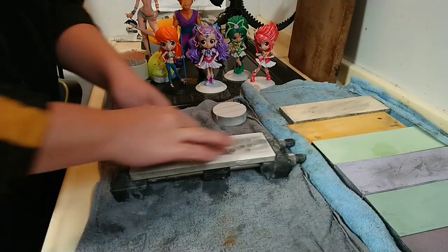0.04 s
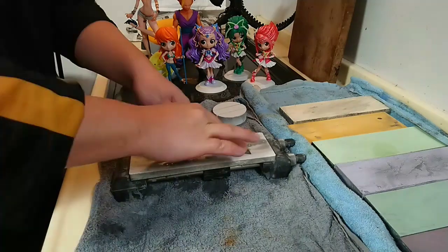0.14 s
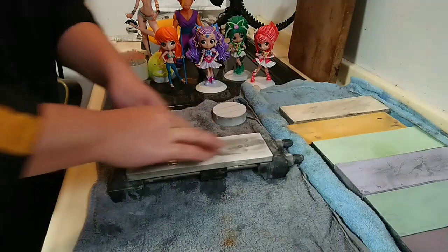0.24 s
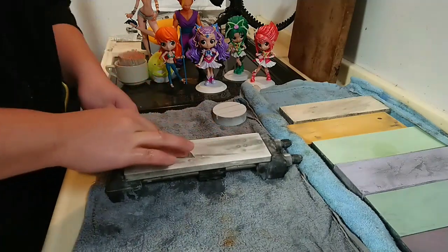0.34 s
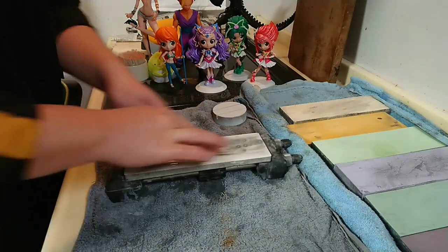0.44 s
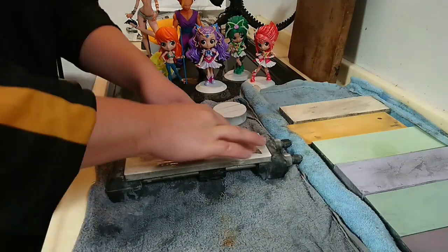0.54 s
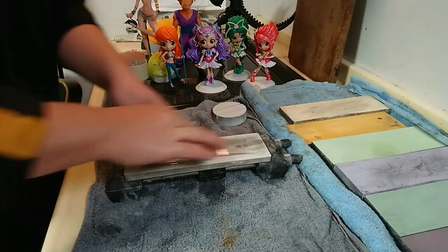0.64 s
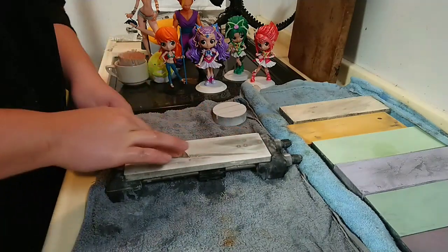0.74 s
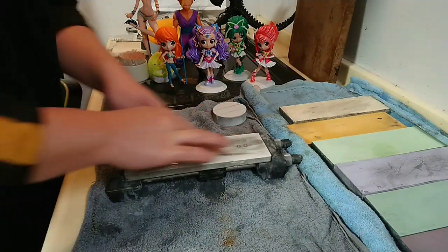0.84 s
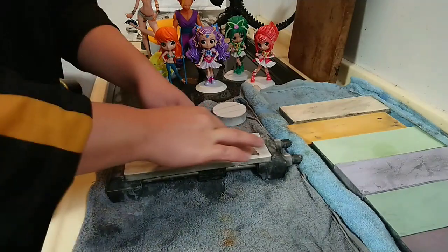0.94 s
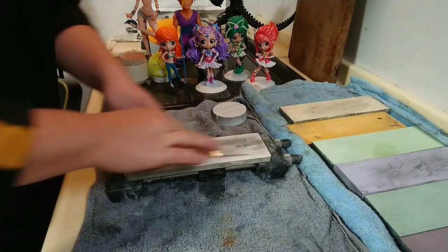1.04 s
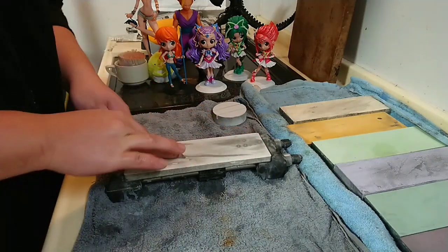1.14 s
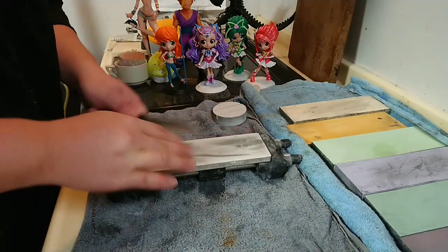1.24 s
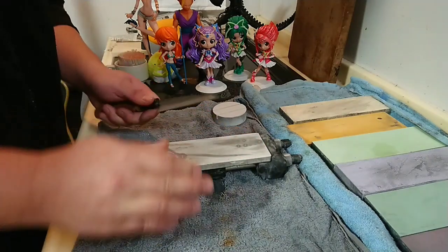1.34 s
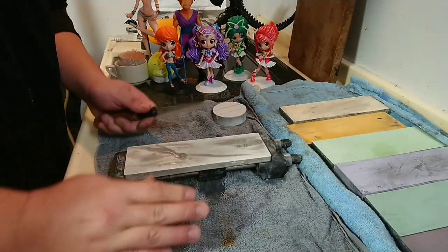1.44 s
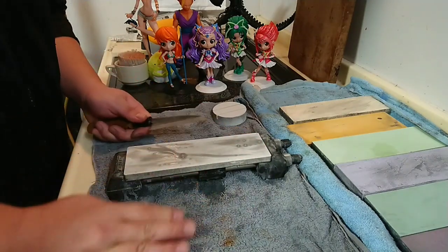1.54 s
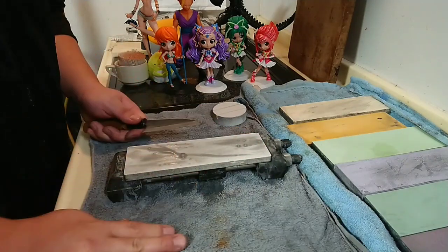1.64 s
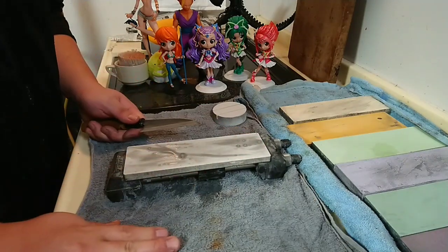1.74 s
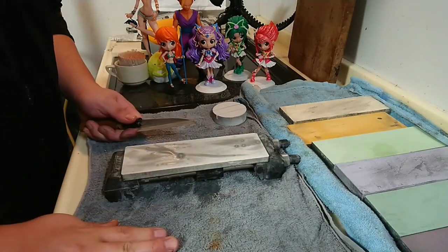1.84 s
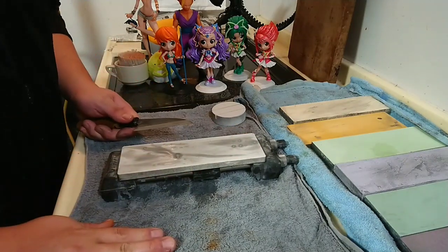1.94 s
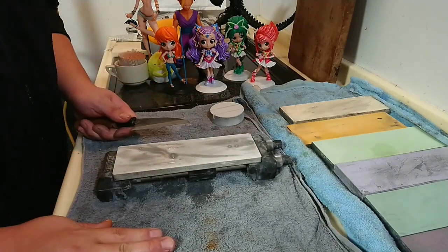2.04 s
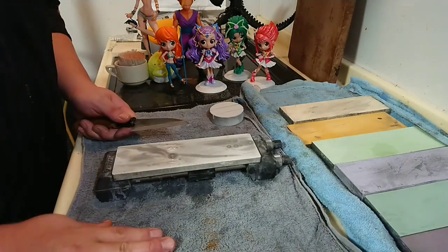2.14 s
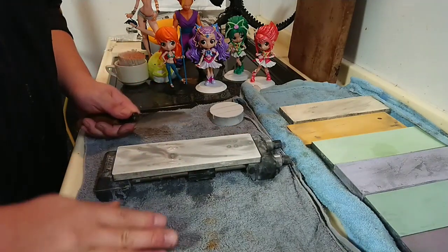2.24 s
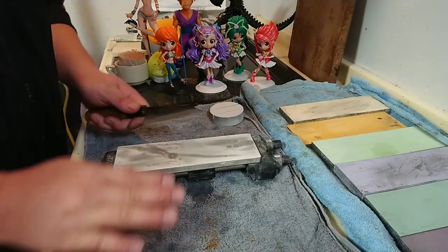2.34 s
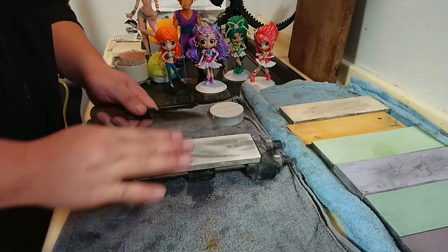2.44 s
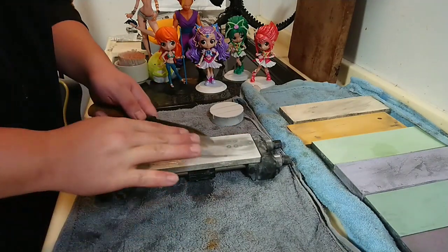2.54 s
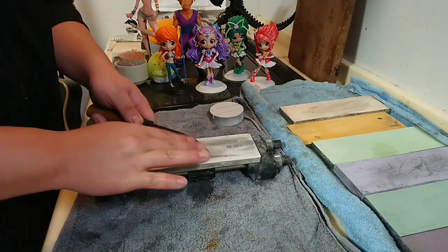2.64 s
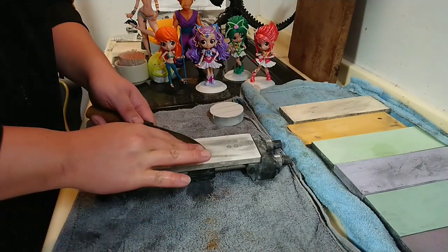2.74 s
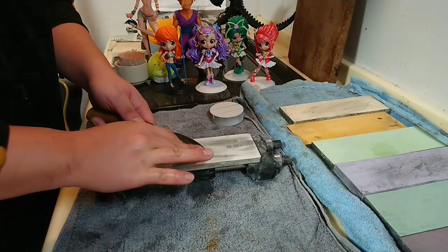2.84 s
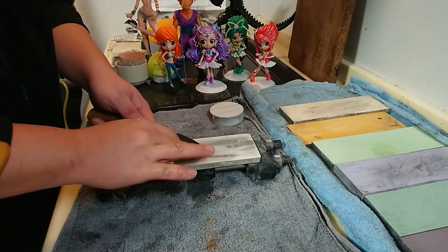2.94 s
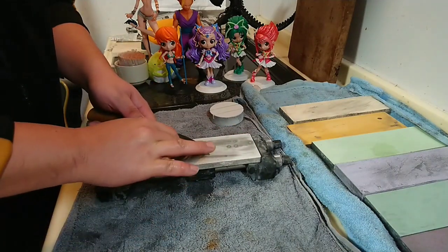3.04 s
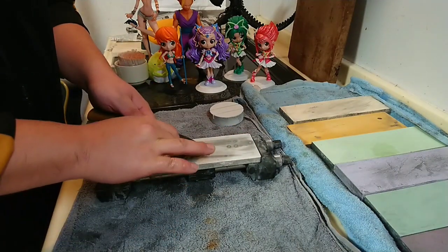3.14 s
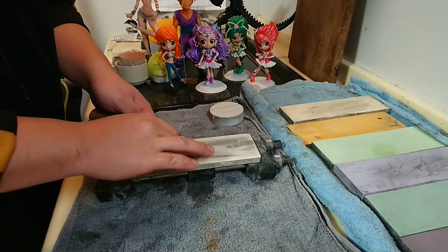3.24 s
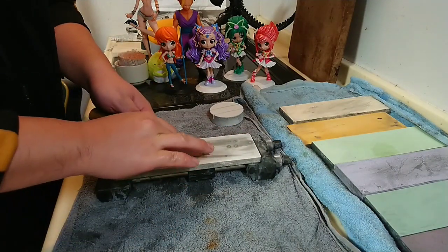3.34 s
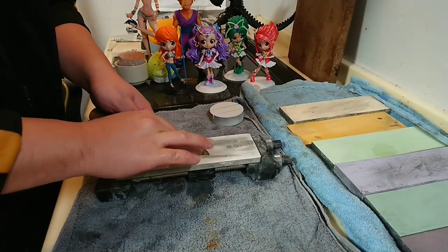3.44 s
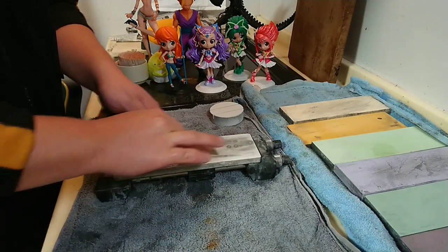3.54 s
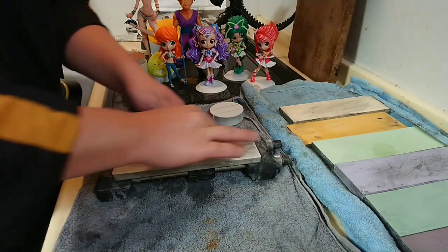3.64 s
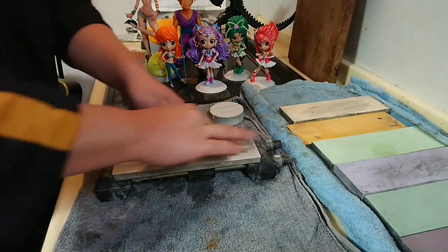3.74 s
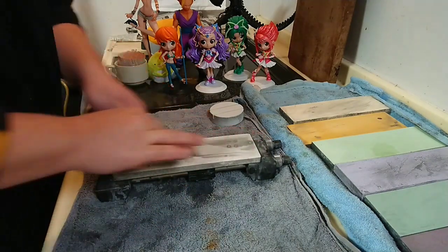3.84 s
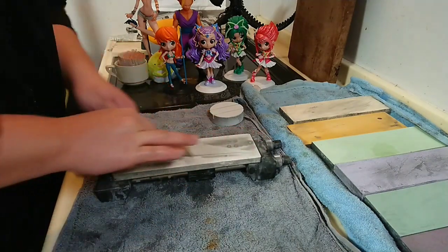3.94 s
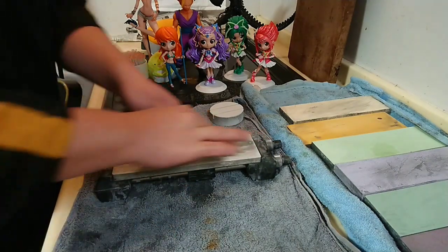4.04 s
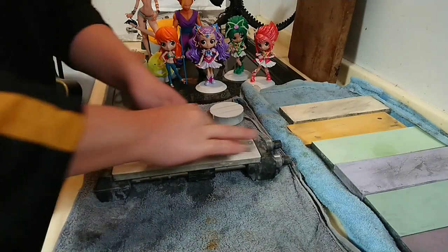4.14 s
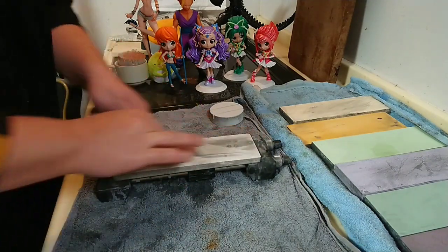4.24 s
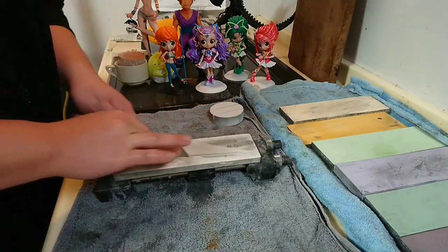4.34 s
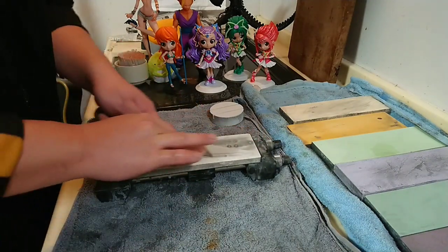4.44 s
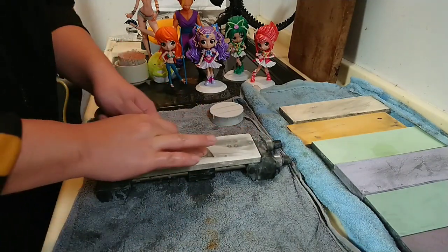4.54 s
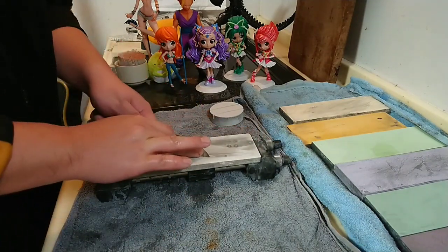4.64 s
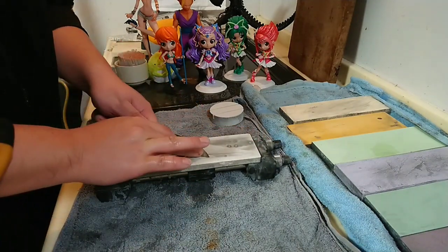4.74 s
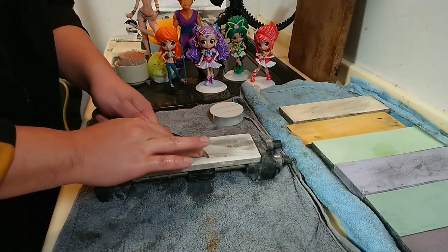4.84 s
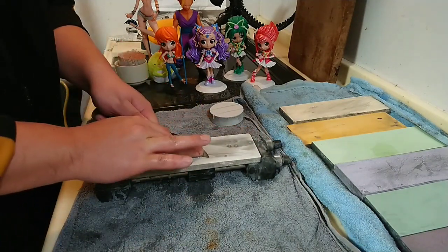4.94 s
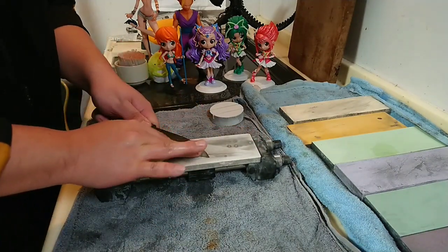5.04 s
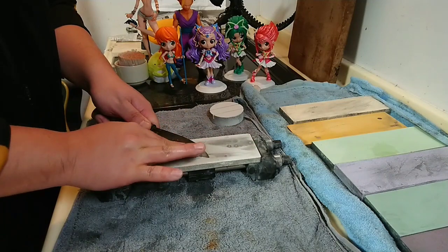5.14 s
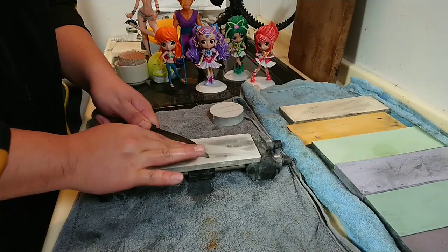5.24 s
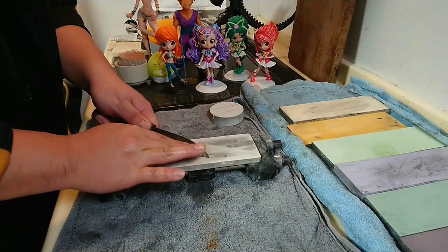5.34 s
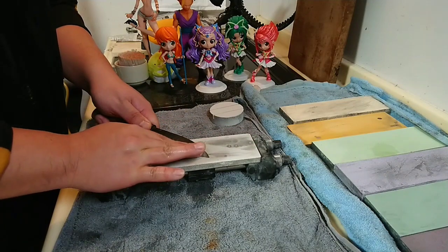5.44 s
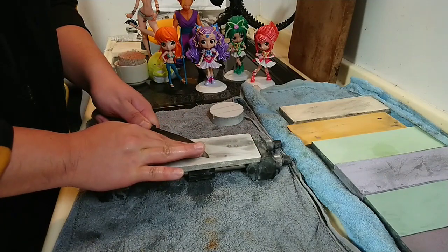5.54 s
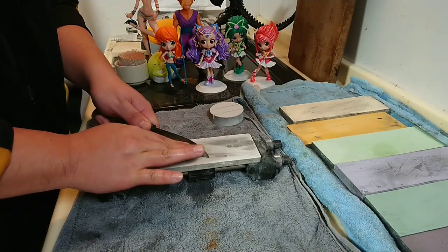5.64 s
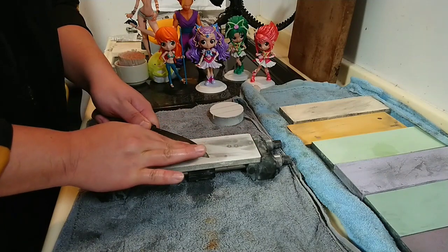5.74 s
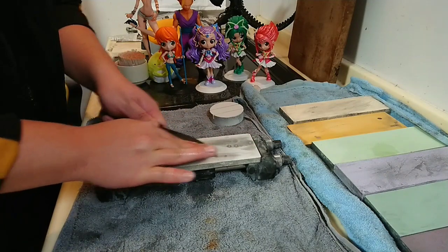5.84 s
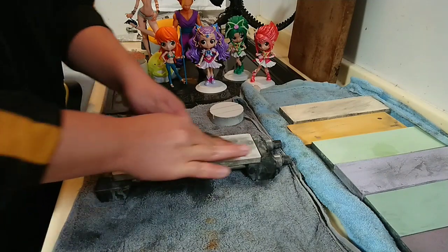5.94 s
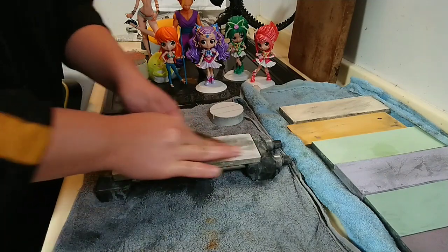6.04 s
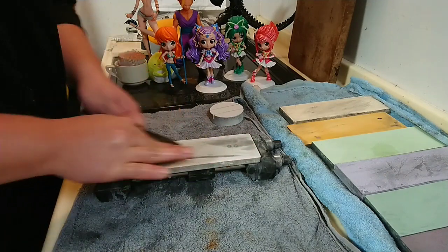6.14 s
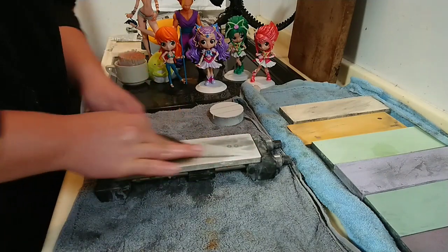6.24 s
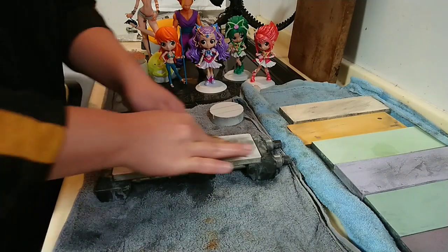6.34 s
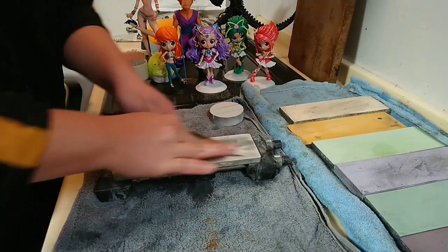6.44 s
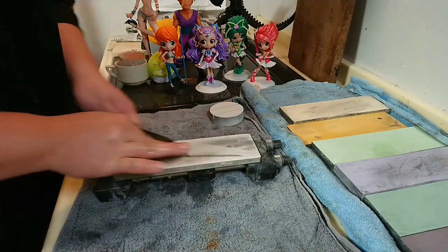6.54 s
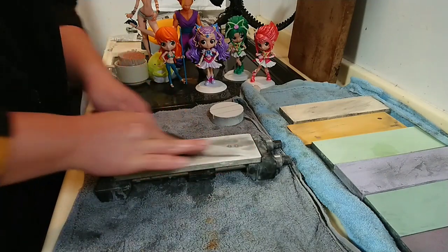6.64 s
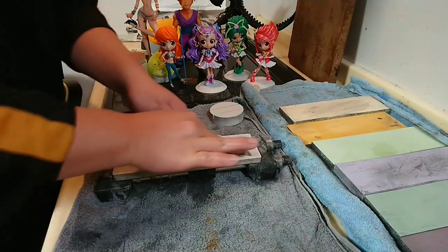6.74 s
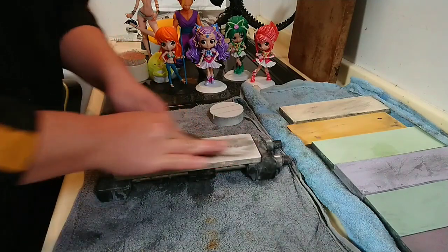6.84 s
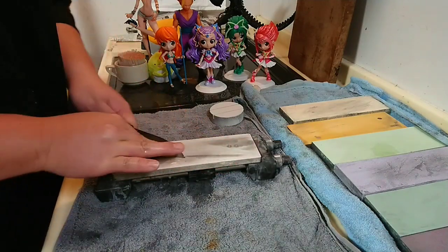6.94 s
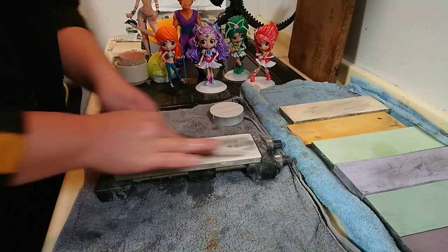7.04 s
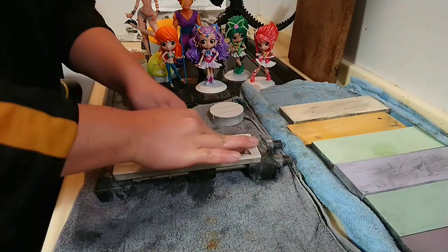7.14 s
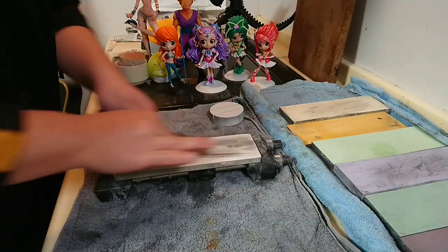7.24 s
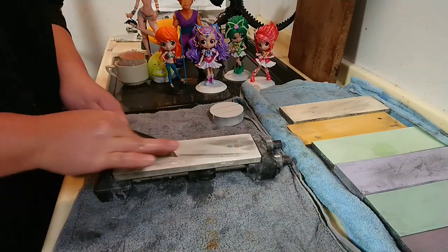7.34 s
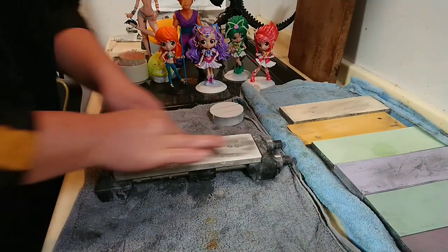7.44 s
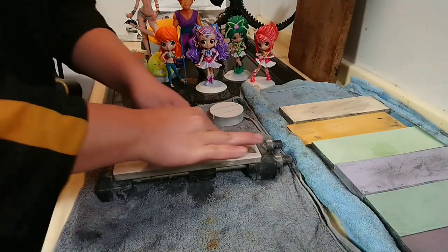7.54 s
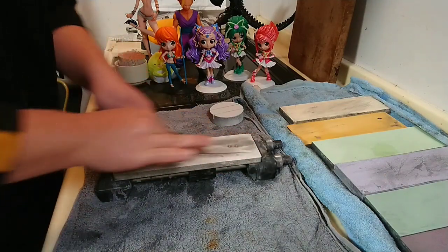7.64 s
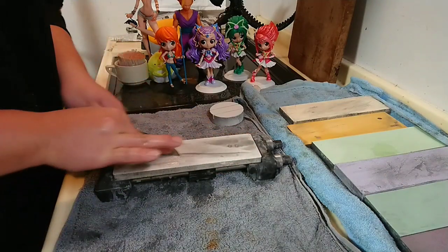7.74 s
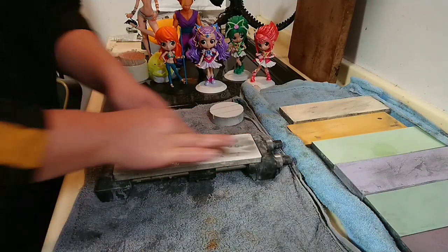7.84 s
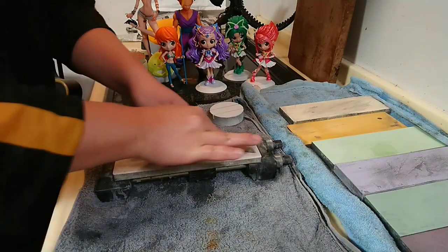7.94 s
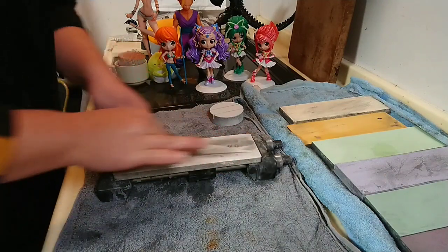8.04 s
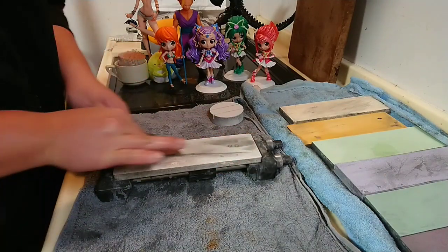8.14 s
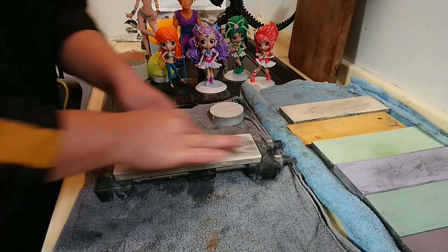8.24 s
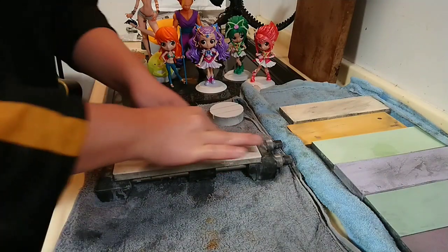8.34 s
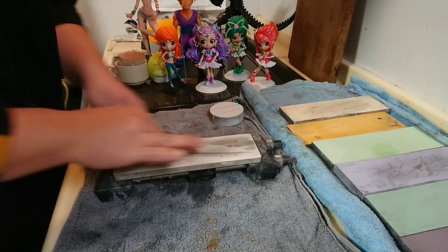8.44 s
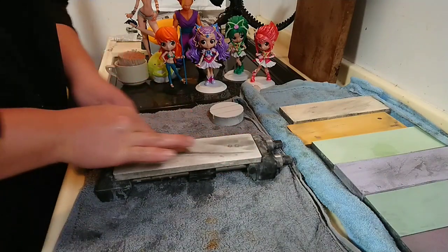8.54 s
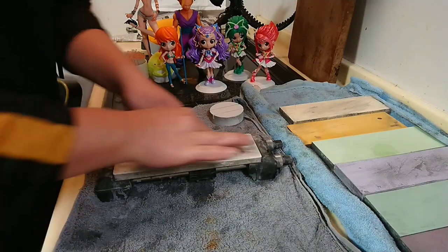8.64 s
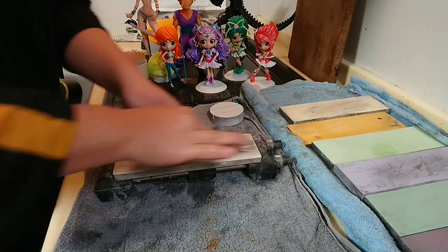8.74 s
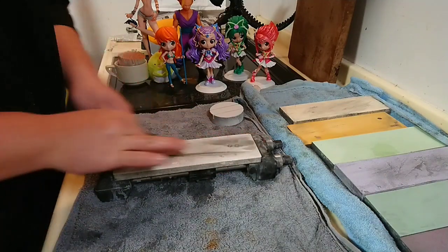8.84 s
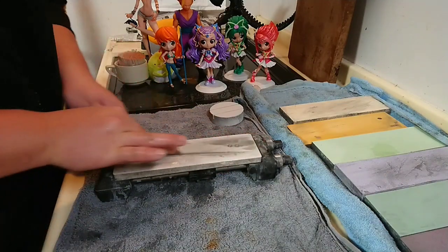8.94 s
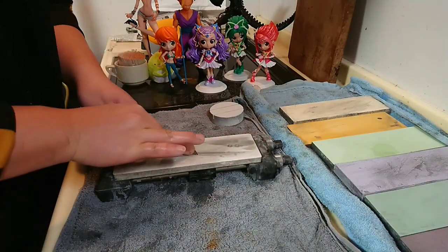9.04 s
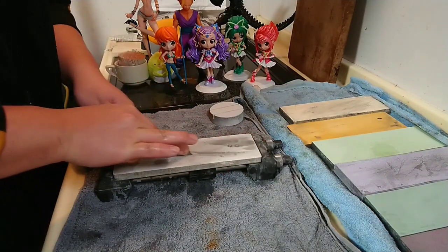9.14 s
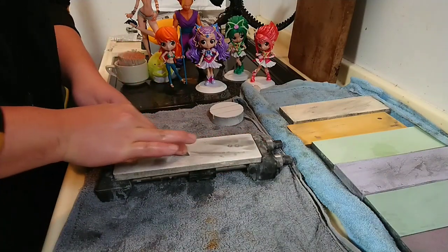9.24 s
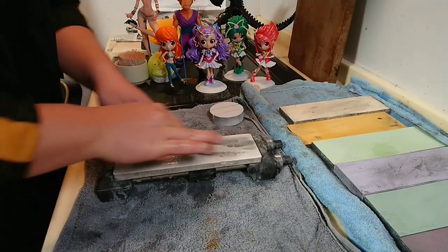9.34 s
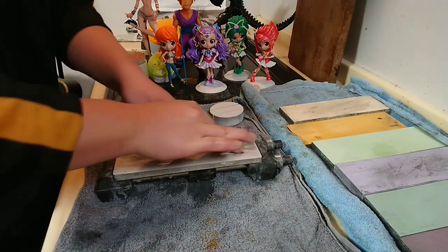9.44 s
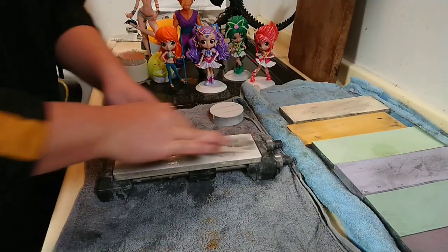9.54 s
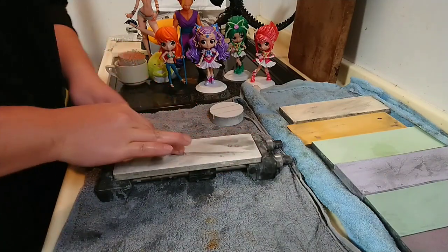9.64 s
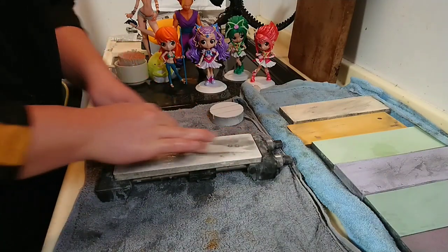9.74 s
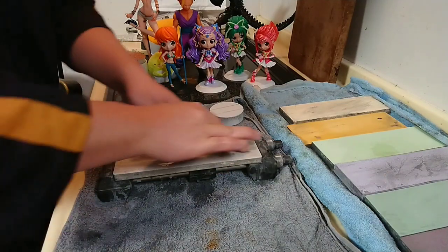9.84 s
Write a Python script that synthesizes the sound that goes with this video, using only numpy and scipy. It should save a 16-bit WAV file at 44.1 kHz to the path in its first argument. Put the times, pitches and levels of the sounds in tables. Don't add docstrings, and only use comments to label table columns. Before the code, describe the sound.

Three runs of fast whetstone strokes, heard close in a dry indoor room. The scrape is dense, sandy hiss with thin blade ringing and a lower stony rasp, swelling and dipping with each push and pull. The first run is duller, the middle one short and brighter, the last long and steady with a small hitch near its end. Quiet gaps hold light clicks, wet fizz and faint room noise; low table rumble lies under the strokes.

```python
import sys
import numpy as np
from scipy import signal
from scipy.io import wavfile
from scipy.ndimage import uniform_filter1d

SR = 44100
rng = np.random.default_rng(int(sys.argv[2]) if len(sys.argv) > 2 else 0)


def linear_from_db(decibels):
    return 10 ** (np.asarray(decibels, float) / 20)


def to_wav(s):
    ch = np.atleast_2d(s).T
    pcm = np.round(np.clip(ch, -1, 1) * 32767)
    wavfile.write(sys.argv[1], SR, pcm.astype(np.int16))


N = 436149
TIME = np.arange(N) / SR

# turn_s, top_db, top_speed_place (0-1), stone_ring_db, turn_level_db
FIRST_RUN = [(-0.05, -22, 0.37, -18.5, -43.5), (0.175, -29, 0.51, -11, -54.5),
             (0.384, -24, 0.46, -16.5, -43), (0.582, -27, 0.49, -17, -42), (0.778, -24.5, 0.43, -15, -44),
             (0.976, -26.5, 0.33, -20, -40)]
SECOND_RUN = [(3.468, -28, 0.69, -18.5, -62), (3.734, -24.5, 0.5, -19.5, -44),
              (3.939, -23, 0.54, -18.1, -40), (4.143, -25.5, 0.4, -17.5, -44),
              (4.352, -32, 0.37, -19.6, -48), (4.539, -45, 0.48, -15, -69)]
THIRD_RUN = [(5.799, -25.5, 0.61, -24, -61), (6.023, -23, 0.54, -22.5, -40), (6.224, -21.5, 0.44, -27, -43),
             (6.412, -26.5, 0.54, -24.5, -37), (6.614, -22, 0.5, -28, -42.5), (6.8, -24, 0.47, -28.5, -39),
             (6.991, -23, 0.51, -29.5, -40), (7.174, -27, 0.52, -22.5, -33.5),
             (7.374, -22.5, 0.55, -27.5, -38), (7.572, -25.5, 0.47, -23.5, -37.5),
             (7.767, -24, 0.42, -27, -41.5), (7.961, -25, 0.6, -24, -33.5), (8.152, -22.5, 0.47, -27, -37),
             (8.348, -27, 0.44, -26, -34), (8.543, -24, 0.56, -31, -41.5), (8.73, -24, 0.54, -24, -33.5),
             (8.937, -28.5, 0.34, -26, -40), (9.092, -40, 0.48, -23.5, -51.5),
             (9.255, -22.5, 0.55, -30, -53.5), (9.495, -26.5, 0.52, -24, -41.5),
             (9.7, -24.5, 0.48, -22.5, -46)]
# end_s, end_level_db, blade_ring_db, brightness_db, held_pitch_factor
RUNS = [
    (1.208, -49.5, -5.5, -2, .995),
    (4.7, -56, 0.5, -1, 1.053),
    (9.92, -61, -1, 0, 1.002),
]
OPENING_WAY = (-1, 1, 1)
# pitch_hz, width_hz, level_db
PRESSED_BLADE = [(2570, 150, -6.5), (2820, 340, -15), (3273, 45, -30), (3190, 18, -2), (3670, 40, -5),
                 (4800, 540, -11.5), (4995, 43, -13), (5500, 240, -11.5), (5500, 30, -11.5),
                 (6020, 120, -2), (6696, 30, -8), (6984, 760, -3), (8900, 2600, 6.5)]
# pitch_hz, width_hz, level_db
STONE = [(1320, 73, -12), (1462, 73, 3.5), (1572, 460, -1), (1640, 110, 2.5), (2050, 97, -6.5)]
# pitch_hz, width_hz, level_db
HELD_BLADE = [(3310, 300, 1.5), (5340, 320, 2.5), (6930, 300, 2), (9000, 420, 3)]
# time_s, share
GRIP = [(0, -.3), (1.2, -0.23), (3.4, 1), (9.89, 0.56)]
# pitch_hz, width_hz, level_db
FREE_BLADE = [(3180, 180, -7.5), (5100, 2200, 9), (6400, 690, 4.5), (7240, 440, -1), (9440, 660, 11.5),
              (11100, 1200, -7), (13800, 3000, -2)]
# pitch_hz, level_db
LEFT_PORT = [(300, -28), (550, -23.5), (900, -22.5), (1500, -22), (2100, -20), (3000, -11.5), (3800, -7.5),
             (4600, -4.5), (5400, -0.6), (6200, -6.5), (6900, -7), (8300, -10), (11500, -10.5),
             (15600, -16)]
RIGHT_PORT = [(300, -35.5), (550, -35.5), (900, -28), (1600, -21), (2300, -18.5), (3200, -10.5),
              (4300, -15), (5400, -17), (5900, -43), (6400, -9), (6900, -2), (7800, -12.5), (11000, -14.5),
              (15600, -15.5)]
# pitch_hz, width_hz, level_db
RIGHT_NOTCH = (5900, 170, -26.5)
# pitch_hz, likeness (0-1)
LIKENESS = [(100, 0.44), (900, 0.29), (1650, 0.5), (2200, 0.11), (3500, 0.091), (5000, 0.14), (6500, 0.21),
            (7500, 0.4), (8300, 0.37), (9200, 0.94), (9800, 0.93), (11200, 0.55), (12500, 0.11),
            (15500, 0.64)]
# pitch_hz, lead_radians
LEFT_LEAD = [(600, 0), (1400, 1.0), (1900, 2.6), (2600, 3.0), (5500, 3.0), (6600, 0)]
# time_s, level_db, upper_modes_db
LEAN_ON_TABLE = [(0, -57, -2), (.86, -46, -4), (1.15, -50.5, -2.5), (1.56, -71, -18), (1.66, -62, -11.5),
                 (2.7, -69.5, -17), (3.42, -62.5, -21), (3.56, -54, 0.5), (4.2, -49, 0), (4.72, -51.5, -12),
                 (5.04, -65, -26), (5.74, -86, -4), (5.86, -55, 2), (6.06, -49.5, -1), (7.1, -44.5, -4),
                 (8.66, -46, -3.5), (9.14, -50, -3), (9.89, -45.5, 0.5)]
# pitch_hz, width_hz, level_db
TABLE_LOW = [(49.7, 6.3, -6.5), (75, 25, -5.5)]
TABLE_HIGH = [(103.7, 12, 1.5), (149, 41, -3), (196.6, 13.6, -5), (243, 28, -14.5)]
# pitch_hz, density_db
HUSH = [(18, -50), (34, -18), (75, 1), (113, -18), (158, -8), (205, -28), (328, -25), (380, -20),
        (612, -32), (1140, -29), (2920, -49), (6000, -57), (8250, -54), (10200, -41), (12600, -64),
        (15000, -68)]
# pitch_hz, balance_db
HUSH_BALANCE = [(60, 4), (180, 0), (550, 12), (1650, 11.5), (4970, 22), (15000, 22)]
# pitch_hz, width_hz, level_db
WHINE = (6740, 30, -95)
# pitch_hz, width_hz, level_db
HUM = [(74, 7.5, -67.5), (149, 10, -71)]
# time_s, level_db
LIFT = [(1.1, -70), (1.2, -56), (1.27, -66), (1.35, -76), (1.6, -100)]
# time_s, level_db
RESTING = [
    [(2.2, -106), (2.5, -81), (3.1, -79), (3.5, -81)],
    [(4.48, -62), (4.8, -70), (5.25, -81.5), (5.55, -106)],
]
# pitch_hz, density_db
SLURRY = [(470, -45.5), (800, -11), (1080, -9.5), (2070, -3.5), (2620, -1.5), (3360, -1.5), (4250, -9),
          (6510, 3.5), (13100, -12.5), (14500, -0.5), (15800, -17.5)]
# start_s, peak_db, stone_ring_db, slide_s
TOUCHES = [(2.7571, -56, 2, 0.0097), (2.843, -51.5, -8, 0.013), (2.888, -48, -9, 0.019),
           (2.995, -56, -1.5, 0.025), (3.055, -49, -7, 0.0097), (3.067, -49, -8, 0.015),
           (3.084, -43, -6, 0.017), (3.207, -52.5, -7, 0.019), (3.242, -50, -12, 0.013),
           (3.253, -48, -9, 0.015), (3.269, -43, -7, 0.014), (3.484, -46.5, -6, 0.072),
           (4.56, -43, -26, 0.015), (4.754, -53.5, 5, 0.047), (4.802, -54, -2, 0.014),
           (5.846, -25.5, -15, 0.12), (6.43, -31, -14, 0.01), (7.392, -25, -5, 0.024),
           (8.56, -26.5, -14, 0.098), (9.267, -56, -2, 0.0097)]
# start_s, peak_db, stone_ring_db, slide_s
LANDING = [
    (5.783, -51.5, 3.5, 0.019),
]
# low_hz, high_hz, threshold_db
MASKED = (340, 682.4, -27)


def evened(x):
    return x / np.sqrt(np.mean(x ** 2) + 1e-20)


def read(points, hz):
    f, value = np.transpose(points)
    return np.interp(np.log(hz + 1), np.log(f + 1), value)


def shape(x, gain):
    hz, _, z = signal.stft(x, SR, nperseg=1024)
    return signal.istft(z * gain(hz)[..., None], nperseg=1024)[1][..., :N]


def ring(x, modes):
    out = 0
    for hz, width, db in modes:
        r = np.exp(-np.pi * width / SR)
        c = r * np.cos(2 * np.pi * hz / SR)
        level = linear_from_db(db) * (1 - r) / np.sqrt(width)
        out = out + level * signal.lfilter([1, -c], [1, -2 * c, r * r], x)
    return out


def wander(size):
    once = uniform_filter1d(rng.standard_normal(N), size)
    return evened(uniform_filter1d(once, size))


def grit(per_s, spread_db, clump_db):
    size = linear_from_db(spread_db * np.minimum(rng.exponential(1, N), 3))
    size = size * (rng.random(N) < per_s / SR)
    size = size * linear_from_db(clump_db * wander(size=60) + 0.57 * clump_db * wander(size=400))
    return evened(size * rng.standard_normal((2, N)))


def strokes():
    out = np.zeros((7, N))
    for rows, run, way in zip((FIRST_RUN, SECOND_RUN, THIRD_RUN), RUNS, OPENING_WAY):
        end, end_db, blade_db, bright_db, pitch = run
        s, db, place, stone_db, turn_db = np.transpose(rows)
        on = (TIME >= s[0]) & (TIME < end)
        now = TIME[on]
        edges = np.append(s, end)
        k = np.searchsorted(s, now, "right") - 1
        along = (now - s[k]) / np.diff(edges)[k]
        warp = np.log(.5) / np.log(np.clip(place[k], .15, .85))
        speed = abs(np.sin(np.pi * along ** warp))
        rest = linear_from_db(np.interp(now, edges, np.append(turn_db, end_db)))
        bite = rest + linear_from_db(db[k]) * np.tanh(1.406 * speed ** 1.46)
        stone = linear_from_db(stone_db[k]) * (1.2 * rest + linear_from_db(db[k]) * speed ** 1.6)
        reach = -way * (-1) ** k * np.cos(np.pi * along)
        steady = np.ones_like(along)
        pitch = pitch + .012 * reach
        out[:, on] = bite, stone, along, reach, blade_db * steady, bright_db * steady, pitch
    return out


def patchy(pair, bright_db, pitch, patchy_db, streak_db):
    hz, t, z = signal.stft(pair, SR, nperseg=1024, noverlap=768)
    wide, thin = rng.standard_normal((2,) + z.shape[1:])
    wide = evened(uniform_filter1d(uniform_filter1d(wide, size=10, axis=0), size=9, axis=1))
    thin = evened(uniform_filter1d(uniform_filter1d(thin, size=2, axis=0), size=16, axis=1))
    octaves_up = np.clip(np.log2((hz + 1) / 6500), 0, 1)
    tilt = np.outer(octaves_up, np.interp(t, TIME, bright_db))
    held = 0
    for f, width, db in HELD_BLADE:
        off = hz[:, None] - f * np.interp(t, TIME, pitch)
        held = held + db * np.exp(-(off / width) ** 2)
    held = held * np.interp(t, *np.transpose(GRIP))
    even = np.interp(hz, [7500, 10000], [1, .5])[:, None]
    shade = linear_from_db(even * (patchy_db * wide + streak_db * thin) + tilt + held)
    return signal.istft(z * shade, nperseg=1024, noverlap=768)[1][:, :N]


def room(x, t60):
    t = np.arange(8000) / SR
    signs = rng.choice([-1., 1.], (2, 8000))
    taps = signs * (rng.random((2, 8000)) < .05) * linear_from_db(-60 * t / t60) * (t > .002)
    taps = taps / np.linalg.norm(taps, axis=1, keepdims=True)
    return signal.oaconvolve(x, taps, axes=1)[:, :N]


def ports(pair):
    hz, _, z = signal.stft(pair, SR, nperseg=1024)
    same = np.clip(read(LIKENESS, hz), 0, 1)[:, None]
    turned = np.exp(-1j * read(LEFT_LEAD, hz))[:, None] * z[0]
    right = same * turned + np.sqrt(1 - same ** 2) * z[1]
    notch_hz, notch_width, notch_db = RIGHT_NOTCH
    notch = notch_db * np.exp(-((hz - notch_hz) / notch_width) ** 4)
    colour_db = np.array([read(LEFT_PORT, hz), read(RIGHT_PORT, hz) + notch])
    colour = linear_from_db(colour_db - 40 * (hz < 250))
    return signal.istft(np.array([z[0], right]) * colour[..., None], nperseg=1024)[1][:, :N]


def knife():
    ticks = grit(per_s=20000, spread_db=1.5, clump_db=0.4)
    bite, stone, along, reach, blade_db, bright_db, pitch = strokes()
    tap, tap_stone = touches(ticks)
    press_db = -0.5
    bite = linear_from_db(press_db) * bite * ticks
    stone = linear_from_db(press_db + 6.5 - 3 * reach) * stone * ticks + tap_stone
    edge = bite + linear_from_db(-4 + blade_db + 2.5 * reach) * ring(bite, PRESSED_BLADE) / 0.068
    block = linear_from_db(8.0) * ring(stone, STONE) / 0.012

    def gap(hz):
        return linear_from_db(-14 * np.exp(-((hz - 4050) / 450) ** 2) - 10 * (hz < 2700))

    free = linear_from_db(3.5) * shape(ring(tap, FREE_BLADE), gap) / 0.032
    near = free + patchy(edge + block, bright_db, pitch, patchy_db=2.2, streak_db=2.6)
    wet = linear_from_db(-15) * room(near, t60=.16)
    pan_db = uniform_filter1d(4.5 + (2.5 - 4.5) * along, size=900)
    return linear_from_db(8.5) * ports(near + wet) * linear_from_db(np.outer([.5, -.5], pan_db - 3.5))


def table():
    lean_s, lean_db, lean_upper_db = np.transpose(LEAN_ON_TABLE)
    level_db = np.interp(TIME, lean_s, lean_db)
    upper_db = np.interp(TIME, lean_s, lean_upper_db)
    settle_s, settle_db, jerk_s, jerk_db = .035, -6, .03, 5
    jolt_db = 0
    for rows in FIRST_RUN, SECOND_RUN, THIRD_RUN:
        turns = np.array(rows)[1:, :1]
        at = (turns + [-settle_s, jerk_s]).ravel()
        jolt_db = jolt_db + np.interp(TIME, at, np.tile([settle_db, jerk_db], len(turns)), 0, 0)
    jolt_db = uniform_filter1d(jolt_db, size=900)
    push = rng.standard_normal((2, N))
    push[1] = 0.66 * push[0] + .55 * push[1]

    def edges(hz):
        return linear_from_db(read([(28, -36.5), (45, 0.5), (215, -5.5), (300, -12.5), (600, -13.0), (1000, -48)], hz))

    low = evened(shape(ring(ring(push, TABLE_LOW), [(59, 42, 0)]), edges))
    high = evened(shape(ring(ring(push, TABLE_HIGH), [(159, 470, 0)]), edges))
    low = linear_from_db(jolt_db) * low * linear_from_db(np.array([[3.5], [-6]]))
    high = linear_from_db(upper_db + 0.66 * jolt_db) * high * linear_from_db(np.array([[2.5], [-3.5]]))
    return linear_from_db(level_db) * (low + high)


def hush():
    def tilt(hz):
        return linear_from_db(read(HUSH, hz) + np.outer([.5, -.5], read(HUSH_BALANCE, hz)))

    spectrum = linear_from_db(read(HUSH, np.fft.rfftfreq(1024, 1 / SR)))
    noise = shape(rng.standard_normal((2, N)), tilt) / np.sqrt(np.mean(spectrum ** 2))
    whine = linear_from_db(WHINE[2]) * evened(ring(rng.standard_normal(N), [WHINE]))
    hum = 0
    for mode in HUM:
        tone = ring(ring(rng.standard_normal(N), [mode]), [mode])
        hum = hum + linear_from_db(mode[2]) * evened(tone)
    return linear_from_db(-70.5) * noise + whine * np.array([[.3], [1]]) + hum * np.array([[1.3], [.7]])


def slurry():
    level = 0
    for rows in [LIFT] + list(RESTING):
        level = level + linear_from_db(np.interp(TIME, *np.transpose(rows), -120, -120))
    fizz = shape(grit(per_s=20000, spread_db=1.5, clump_db=1.9), lambda hz: linear_from_db(read(SLURRY, hz)))
    return linear_from_db(5.5) * level * evened(fizz)


def touches(ticks):
    size = 5000
    bite, stone = np.zeros((2, 2, N))
    for s, db, stone_db, slide in list(TOUCHES) + list(LANDING):
        at = round(s * SR)
        fade = np.exp(-TIME[:size] / max(slide, .002))
        hit = linear_from_db(db - 10) * fade * ticks[:, at:at + size]
        hit[:, 0] += linear_from_db(db + 4)
        bite[:, at:at + size] += hit
        stone[:, at:at + size] += linear_from_db(stone_db) * hit
    return bite, stone


def scene():
    return knife() + table() + hush() + slurry()


def band_limit(x):
    return signal.sosfilt(signal.butter(12, 16420, fs=SR, output="sos"), x)


def record(dry):
    low_cut = signal.butter(4, 36, "high", fs=SR, output="sos")
    hz, t, z = signal.stft(signal.sosfilt(low_cut, dry), SR, nperseg=2048)
    power = uniform_filter1d((dry ** 2).mean(0), size=2500)
    power_db = 10 * np.log10(np.interp(t, TIME, power) + 1e-12)
    low_hz, high_hz, threshold_db = MASKED
    drop_db = -8 * np.clip(power_db - threshold_db, 0, 4)
    band = (hz > low_hz) & (hz < high_hz)
    top_db = -90 * (hz > 15770)[:, None]
    mix = signal.istft(z * linear_from_db(np.outer(band, drop_db) + top_db), nperseg=2048)[1][:, :N]
    return band_limit(mix)


dry = scene()
out = record(dry)
to_wav(out)
```